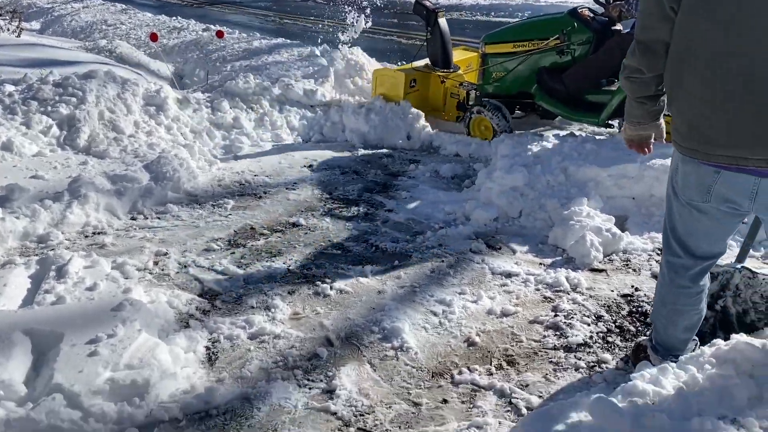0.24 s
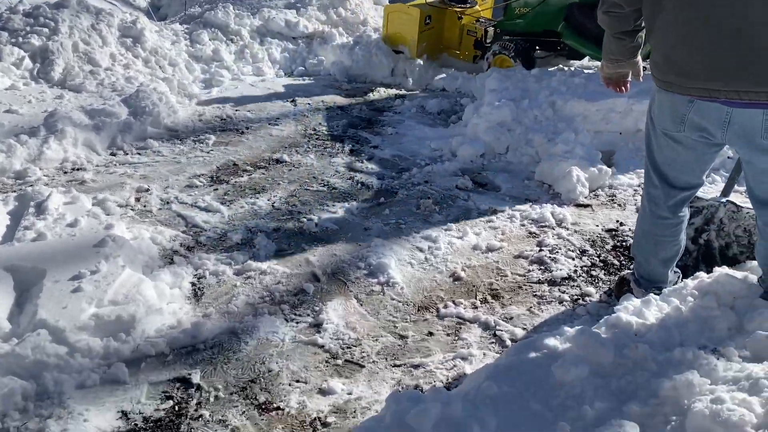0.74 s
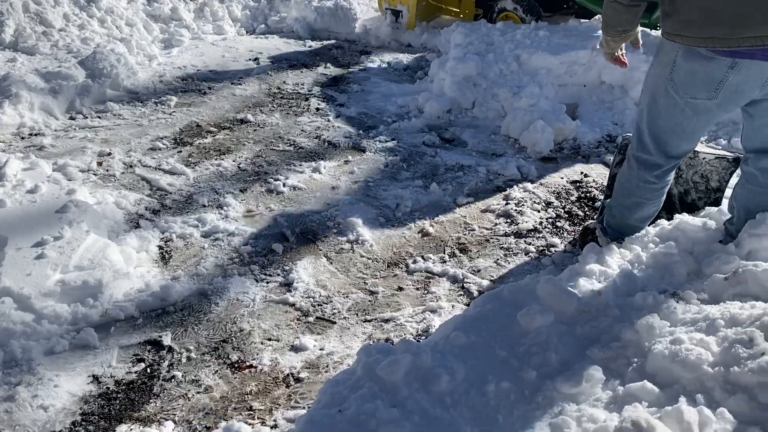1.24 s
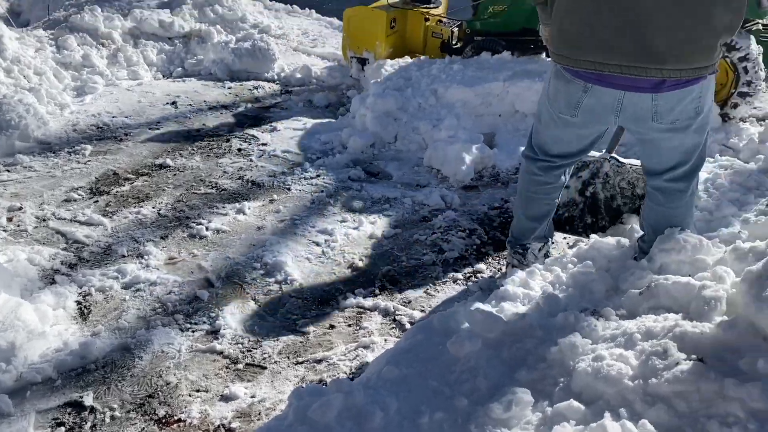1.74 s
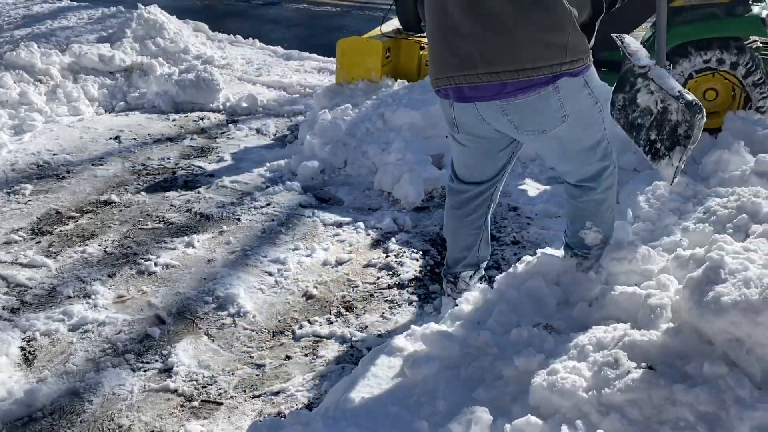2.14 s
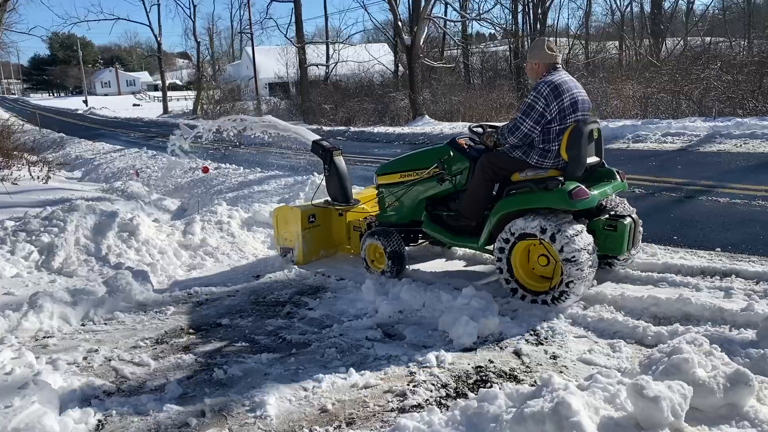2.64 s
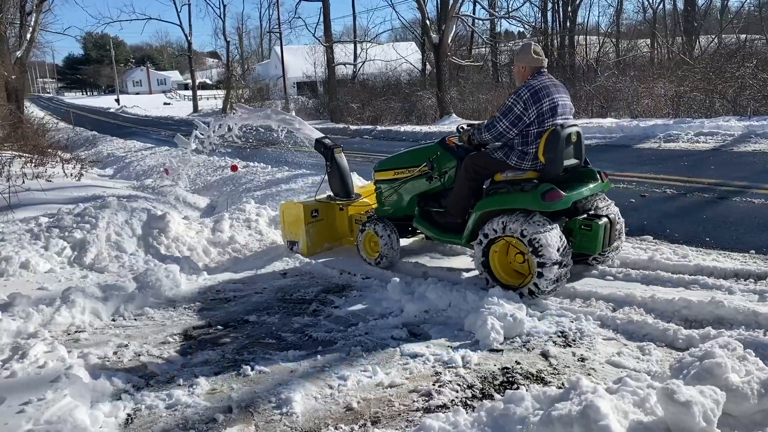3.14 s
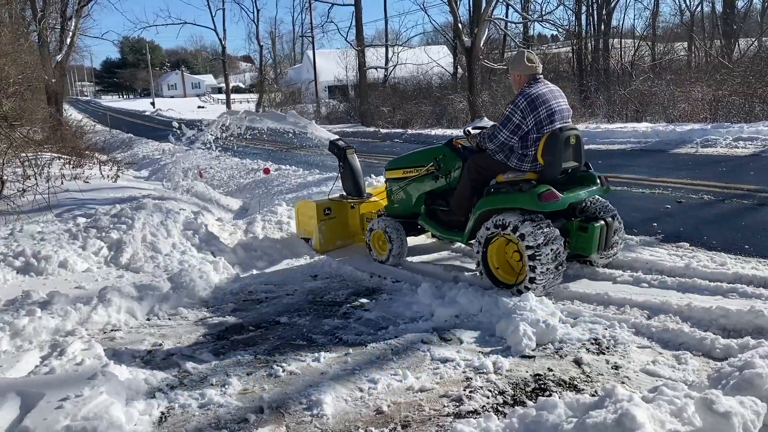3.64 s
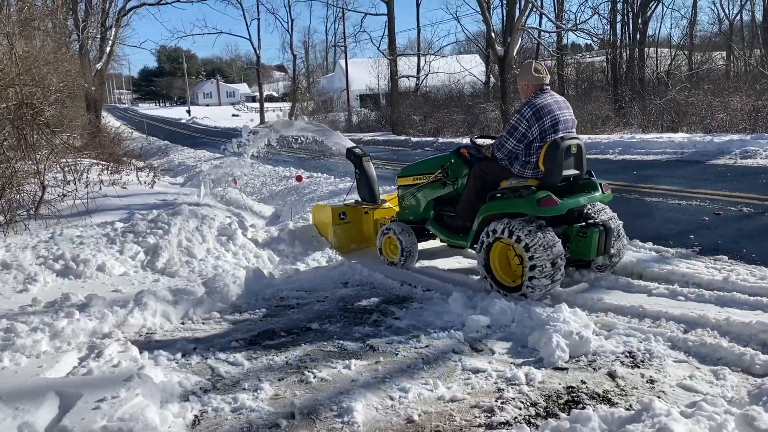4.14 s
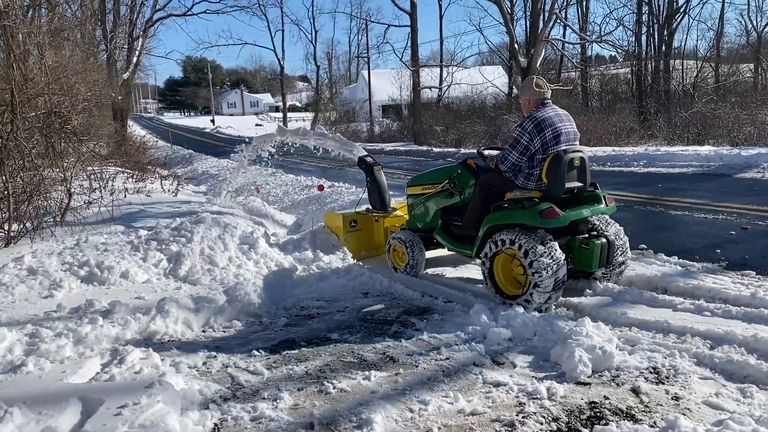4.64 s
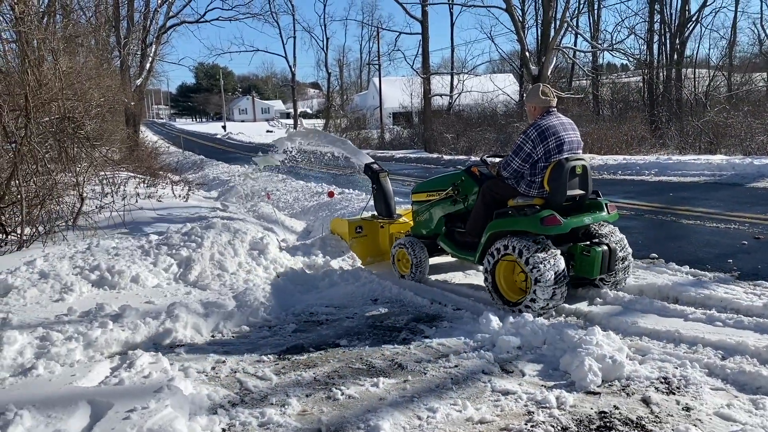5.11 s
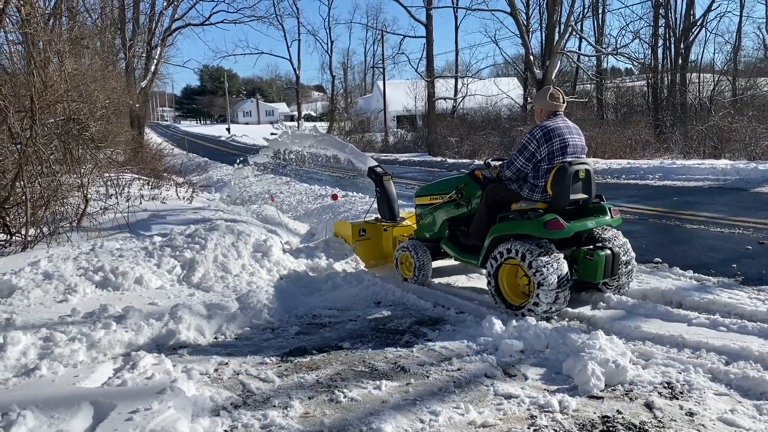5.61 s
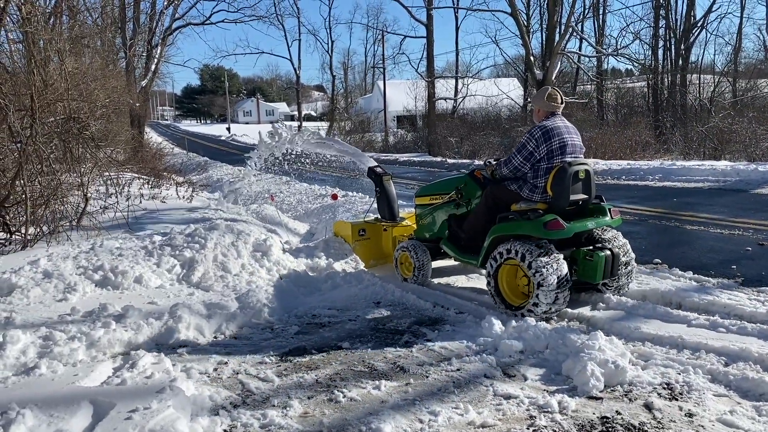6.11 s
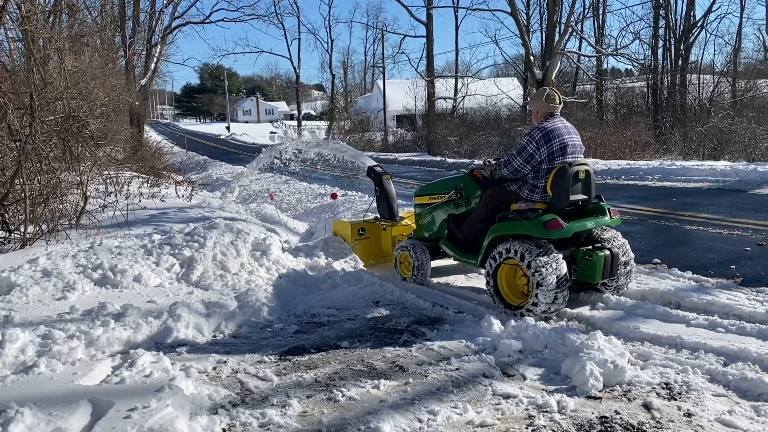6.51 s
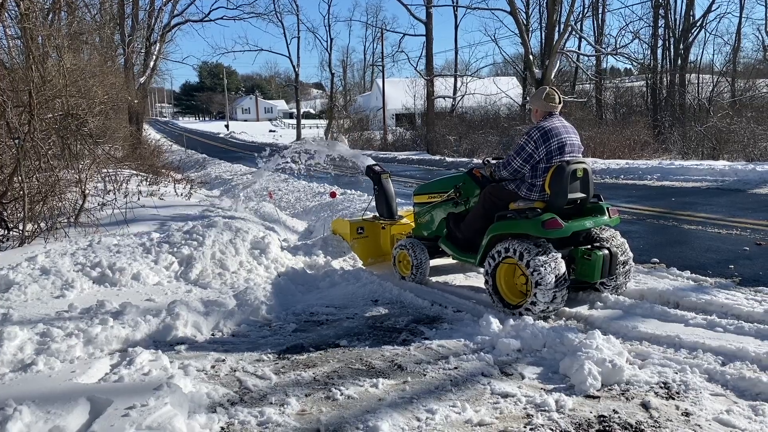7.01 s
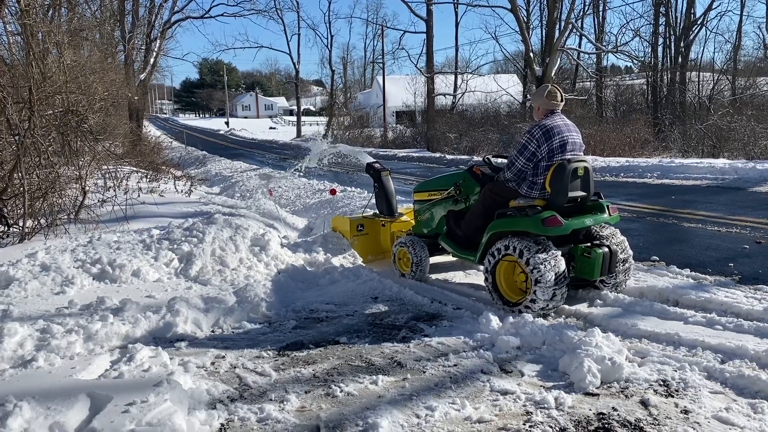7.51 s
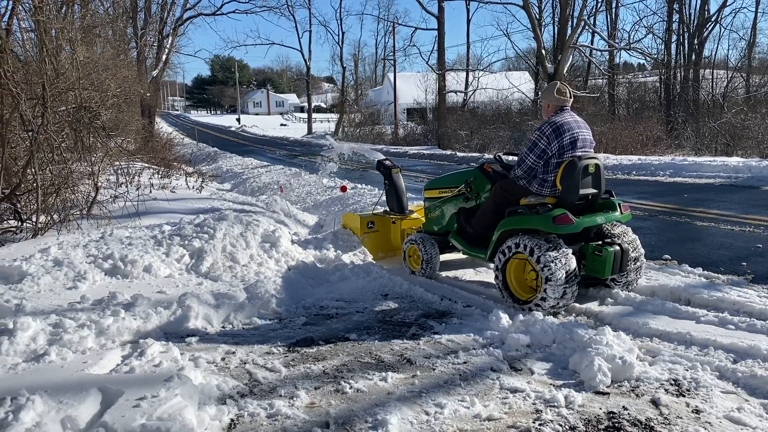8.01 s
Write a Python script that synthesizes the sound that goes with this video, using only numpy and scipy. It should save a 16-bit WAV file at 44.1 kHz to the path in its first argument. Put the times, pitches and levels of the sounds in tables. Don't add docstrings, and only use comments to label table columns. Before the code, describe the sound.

A continuous small-engine chug and broadband snowblower roar, heard on a phone held in the open air. The first part is more distant, with metallic ringing and brief squeaks. After a tiny dip it steps up, close and gritty, with impeller throb, whining gears and gushes of packed snow. Low dull thuds come midway, then a short metal knock late; the machine never stops.

```python
import sys
import numpy as np
from scipy import signal
from scipy.fft import irfft
from scipy.io import wavfile
from scipy.ndimage import uniform_filter1d, map_coordinates

SR = 44100
rng = np.random.default_rng(int(sys.argv[2]) if len(sys.argv) > 2 else 0)


def nominal_scale(level):
    x = np.asarray(level, float) / 20
    return 10 ** x


def master_out(mix):
    frames = np.transpose(np.atleast_2d(mix))
    ceiling = np.clip(frames, -1, 1)
    pcm = np.round(ceiling * 32767).astype(np.int16)
    wavfile.write(sys.argv[1], SR, pcm)


N = 364266
T = np.arange(N) / SR
HOP = 1024
F = np.maximum(np.arange(HOP + 1) * SR / (2 * HOP), 1)
CHANGE_S, CHANGE_FADE_S = 2.578, .007

# t/s, cycle rate f/Hz, exhaust level/dB, snow load as growl level/dB under the exhaust
ENGINE = [
    [(0.0, 25.24, -25, -21), (0.31, 24.82, -23, -23.5), (0.54, 24.55, -21.5, -19.5),
     (0.99, 26.12, -24, -23), (1.72, 24.44, -23, -14.5), (2.19, 25.96, -23.5, -11.5),
     (2.57, 25.97, -24, -15.5)],
    [(2.59, 25.01, -18.5, -9), (3.06, 25.29, -18.5, -10.5), (3.73, 24.63, -19, -10),
     (4.06, 24.89, -20.5, -8.5), (4.78, 23.91, -19, -5), (5.08, 25.29, -20, -5.5),
     (5.4, 24.71, -20.5, -6.5), (6.0, 25.8, -21, -8.5), (6.55, 24.88, -21, -9), (7.23, 26.2, -21, -10),
     (8.26, 25.72, -21.5, -12)],
]
# multiple of the cycle rate, level/dB
PARTIALS_FAR = [(1, -39), (2, -9.5), (3, -15.5), (4, -12), (5, 0), (6, -3.5), (7, -15.5), (8, -3.5),
                (9, -10.5), (10, -28), (11, -19), (12, -27), (13, -25.5), (14, -30), (15, -22.5),
                (16, -27.5), (17, -23.5), (18, -28.5), (19, -38), (20, -42)]
PARTIALS_NEAR = [(1, -36), (2, -6), (3, -12.5), (4, -13.5), (5, 1.5), (6, -5.5), (7, -22.5), (8, -7),
                 (9, -12), (10, -27.5), (11, -12.5), (12, -21), (13, -16.5), (14, -21.5), (15, -22.5),
                 (16, -23), (17, -20.5), (18, -29.5), (19, -34), (20, -41)]
MUFFLER = (.46, 1.3, .1, 1), (1.42, 1, .3, .5)
# multiple of the cycle rate, level/dB
THROB = [
    (1.86, -5),
    (3.72, 4.5),
    (5.58, 0.5),
    (7.44, -9),
]
# t/s, level/dB
BITES = [
    (2.8, 3),
    (4.23, 5.3),
    (5.15, 8),
    (5.7, 6.5),
    (6.44, 5),
    (6.82, 7.95),
]
BLOWER_BANDS = [90, 1000, 3300, 8000]
# f/Hz, far level/dB per Hz, near level/dB per Hz
ROAR = [(30, -82, -76), (49.95, -58.5, -50.5), (150.1, -58.5, -52), (403, -65, -56.5), (657, -67, -64.5),
        (990, -67, -60), (1320, -69, -65), (2400, -71, -65.5), (4470, -72, -68), (5360, -73.5, -77),
        (8500, -79.5, -72), (10800, -86, -77.5), (14200, -89.5, -80.5), (16000, -90, -85)]
# start t/s, end t/s, f/Hz, width f/Hz, level/dB
RINGS = [
    [(0, 2.6, 894, 29, -45), (-0.4, 1.65, 2590, 140, -41), (0.5, 1.996, 4100, 120, -50),
     (.76, 1.67, 6168, 79, -40.5), (0.2, 1.466, 4940, 240, -48), (0, 2.2, 7000, 220, -53.5),
     (2.04, 2.9, 1225, 42.3, -45), (-1.5, 2.6, 8860, 210, -48.5), (0.08, 1.7, 7700, 95, -50.5)],
    [(1.4, 8.3, 872, 42, -39), (2.5, 8.3, 1524, 54, -37.5), (2.8, 6, 1690, 90, -37.5),
     (4.22, 5.22, 1872, 40, -39.5), (1.8, 8.3, 2502, 35, -46), (2.1, 4.1, 4280, 170, -35.5),
     (2.7, 3.52, 6135, 72, -41.5), (2.3, 10, 7490, 170, -42), (2.9, 9.4, 8650, 290, -44.5),
     (5.9, 9.8, 3965, 50, -42.5), (2.5, 4.22, 5270, 140, -40), (2.2, 6.8, 1110, 91, -41.5),
     (3.06, 9.2, 6135, 72, -46.5), (2.5, 2.9, 4250, 220, -35.5)],
]
# t/s, lower f/Hz, upper f/Hz, depth [0-1]
NOTCHES = [(0, 6250, 7100, .5), (.4, 5900, 6950, .65), (.8, 5700, 6450, .9), (1.3, 5650, 6400, .9),
           (1.75, 6000, 6750, .8), (2.1, 5500, 7000, .6), (2.57, 5600, 6400, .6)]
PER_LOAD = (.5, 0.077, -0.081, .05), (1.5, -0.094, 0.0014, 0.14)
RECEDE = (.1, -0.1, -0.56, -0.24), (-.1, -0.8, 0.14, -0.42)
SHADOW = (2.5, 1.5, -4, -6)
PER_SLUG = (.9, 1, 0.6, 0.64)
# t/s, level/dB over the roar
SLUGS = [
    (2.60, 2),
    (3.74, 2.5),
    (3.86, 2.5),
    (4.52, -2),
    (6.08, -0.5),
    (6.88, 2.5),
    (7.275, 1.5),
    (7.79, 1.2),
    (8.21, 2.5),
]
# f/Hz, width f/Hz, level/dB, slope level/dB per s, t/s to come into view
WHINES = [
    (3780, 80, -33, 0.2, 1.09),
    (4710, 120, -33, -.3, 0.27),
]
# start t/s, end t/s, f/Hz, level/dB, wobble f/Hz
SQUEALS = [(.76, 1.16, 2085, -40.5, 6), (.1, .4, 1662, -44, 4), (7.12, 8.3, 2095, -45, 4),
           (2.58, 8.3, 737, -48, 5), (2.58, 6, 1652, -48, 8), (5.8, 8.3, 3972, -47, 12),
           (.35, 1.1, 2420, -43, 10), (.75, 1.2, 905, -47, 6), (0, 1.7, 2945, -46, 12),
           (0, .8, 3340, -47, 10), (2.15, 2.58, 1225, -44, 5), (4.6, 8.3, 890, -45, 4),
           (4.6, 8.3, 1040, -46, 4), (4.6, 8.3, 2500, -47, 5)]
# t/s, f/Hz, level/dB, rise t/s, 60 dB decay t/s
LUMPS = [
    (7.2700, 465, -2, .003, .055),
    (7.2695, 630, -8, .0015, .03),
    (7.2700, 950, -14, .0015, .03),
    (7.2700, 1400, -13, .001, .025),
    (5.48, 88, -9, .03, .35),
    (5.22, 90, -18, .015, .16),
    (6.81, 95, -16, .015, .22),
    (4.77, 90, -17, .015, .22),
]
# f/Hz, lead/rad
LEAD = [
    [(0, 0), (1210, -0.4), (4910, 0.6), (6120, -0.9), (7670, 0.2), (8010, 2.6), (8440, 2.5), (9470, 1.8), (9910, 0.2), (11900, -0.2), (12500, -3.1), (14400, -3.2), (15000, -6.3), (15500, -6.3)],
    [(0, 0), (4650, 0.5), (5250, 2.0), (5510, 0.0), (6120, -1.7), (6460, 0.8), (7320, -1.2), (8870, 2.3), (10400, -0.1), (11600, 0.1), (12600, -3.0), (14400, -3.3), (15000, -6.2), (15500, -6.3)],
]
# f/Hz, left minus right level/dB
PAN = [
    [(60, 0.0), (110, 5), (200, -2), (380, 2.5), (700, -2.5), (1290, -2.5), (2380, 0.5), (4400, 1.5), (8120, -1), (15000, 0.0)],
    [(60, -1), (110, 3.5), (200, -1), (380, 0.5), (700, -3), (1290, 0.5), (2380, 1), (4400, -4), (8120, -1), (15000, -1)],
]
# f/Hz, likeness [0-1]
ALIKE = [(300, 0.96), (900, 0.78), (2000, .95), (2600, 1), (4500, 0.8), (6000, 0.49), (9000, 0.64),
         (10500, 0.8), (11500, .97), (12300, .55), (13100, .97), (13900, 0.86), (14500, .55), (15200, 0.9)]
# t/s, left minus right level/dB
SWAY = [
    (0.0, -0.5),
    (2.46, -1.5),
    (2.69, 1),
    (3.93, 1.0),
    (4.42, 0.5),
    (8.26, 1.0),
]


def curves(table, t):
    s, *columns = np.transpose(table)
    return [np.interp(t, s, column) for column in columns]


def on_log(table, hz):
    at, *columns = np.transpose(table)
    return [np.interp(np.log(hz), np.log(at), column) for column in columns]


def walk(rate, t):
    steps = np.arange(t[0], t[-1] + 1, .25 / rate)
    levels = rng.standard_normal(len(steps))
    levels = uniform_filter1d(uniform_filter1d(levels, size=4), size=4)
    return np.interp(t, steps, levels / levels.std())


def peak(hz, width_hz, db):
    return nominal_scale(2 * db) * 2 / (np.pi * width_hz) / (1 + (2 * (F - hz) / width_hz) ** 2)


def controls(t, shot):
    hz, exhaust_db, growl_db = curves(ENGINE[shot], t)
    return hz, exhaust_db + (0.6, -1.2)[shot], growl_db - growl_db.mean()


def lag(k, centre, width):
    return np.angle(1 - (k / centre) ** 2 + 1j * width * k / centre)


def engine(t, turns, shot, exhaust_db, growl_db):
    out = 0
    rest, lower, width, upper = MUFFLER[shot]
    for k, db in (PARTIALS_FAR, PARTIALS_NEAR)[shot]:
        phase = rest - lower * lag(k, 4.5, .1) - upper * lag(k, 7, width)
        phase += 1.3 * np.arctan((2 / k) ** 4)
        phase -= (.3, .01)[shot] * max(k - 8, 0) ** 2
        scatter_db = min(.11 * k, 1.2) * walk(6, t)
        slip = min(.02 * k, .2) * walk(8, t)
        load_db = growl_db * np.clip((k - (8.5, 7)[shot]) / 3, 0, 1)
        out = out + nominal_scale(db + load_db + scatter_db) * np.cos(2 * np.pi * k * turns + phase + slip)
    return np.sqrt(2) * nominal_scale(exhaust_db) * out


def clatter(t, turns, shot, exhaust_db):
    order, renewals_per_s = np.arange(513), 1.5
    rows = int((t[-1] - t[0]) * renewals_per_s) + 2
    colour = nominal_scale(2 * on_log(ROAR, np.maximum(25 * order, 1))[shot]) ** .5
    colour = colour * (order > 20) * (order < 85)
    colour = colour * nominal_scale(5 * np.minimum(rng.exponential(size=513), 2))
    chance = rng.standard_normal((2, rows, 513))
    patterns = irfft((chance[0] + 1j * chance[1]) * colour)
    patterns = np.hstack([patterns, patterns[:, :1]]) / patterns.std()
    rattle = map_coordinates(patterns, [(t - t[0]) * renewals_per_s, turns % 1 * 1024], order=1)
    return nominal_scale(exhaust_db + (-18, -12.5)[shot]) * rattle


def blower_levels(t, shot):
    shadow = (1 - shot) * np.interp(t, (1.97, 2.1), [0, 1])
    causes = [controls(t, shot)[2], t - t.mean(), shadow - shadow.mean(), slugs(t)]
    answers = [PER_LOAD[shot], RECEDE[shot], SHADOW, PER_SLUG]
    return sum(np.outer(answer, cause) for answer, cause in zip(answers, causes))


def blower_power(t, shot):
    band = np.arange(4)
    place = np.interp(np.log(F), np.log(BLOWER_BANDS), band)
    level_db = blower_levels(t, shot).T @ np.maximum(1 - abs(place - band[:, None]), 0)
    power = nominal_scale(2 * on_log(ROAR, F)[shot]) * np.ones((len(t), 1))
    for start_s, end_s, hz, width_hz, db in RINGS[shot]:
        swell = np.clip(np.minimum(t - start_s, end_s - t) / 0.12 + .5, 0, 1)
        power = power + np.outer(swell ** 2, peak(hz, width_hz, db))
    power = power * nominal_scale(2 * level_db)
    if shot:
        power = power + whines(t)
    else:
        *notch_hz, depth = (column[:, None] for column in curves(NOTCHES, t))
        for hz in notch_hz:
            power = power * (1 - depth / (1 + ((F - hz) / 110) ** 2)) ** 2
    patches = rng.standard_normal(power.shape)
    patches = uniform_filter1d(uniform_filter1d(patches, size=21, axis=0), size=4, axis=1)
    depth_db = (2.2, .9)[shot] * np.clip(F / 1500, 0, 1)
    return power * nominal_scale(2 * depth_db * patches / patches.std())


def blower(start, stop, shot, turns):
    count = (stop - start) // HOP + 2
    power = blower_power((start + HOP * np.arange(count)) / SR, shot)
    chance = rng.standard_normal((2, 3, count, HOP + 1))
    direct, left, right = (chance[0] + 1j * chance[1]) * np.sqrt(power * SR * HOP / 2)
    half = np.exp(.5j * np.interp(F, *np.transpose(LEAD[shot])))
    half = half * nominal_scale(on_log(PAN[shot], F)[0] / 2)
    alike = np.clip(on_log(ALIKE, F)[0], 0, 1)
    pair = np.sqrt(alike) * direct * np.array([[half], [1 / half]])
    pair = pair + np.sqrt(1 - alike) * np.array([left, right])
    gas = np.interp(np.log(F), np.log([150, 400, 1500, 4000]), [.2, 0.76, 1.1, .35])
    window = np.sin(np.pi * (np.arange(2 * HOP) + .5) / (2 * HOP))
    frames = irfft(np.array([pair, gas * pair])) * window
    joined = frames[:, :, 1:, :HOP] + frames[:, :, :-1, HOP:]
    steady, pulsed = joined.reshape(2, 2, -1)[..., :stop - start]
    puff = np.exp(-((turns + .1) % 1) / 0.054)
    puff = puff + 0.27 * np.exp(-((turns + .1 - 3 / 8) % 1) / 0.078)
    return nominal_scale(0.43 * walk(30, T[start:stop])) * (steady + puff * pulsed)


def squeals():
    out = 0
    for start_s, end_s, hz, db, wobble_hz in SQUEALS:
        swell = np.clip(np.minimum(T - start_s, end_s - T) / 0.045, 0, 1)
        level = nominal_scale(db - 0.5 + 2.2 * walk(25, T)) * swell
        pitch_hz = hz + wobble_hz * (walk(5, T) + 2 * walk(40, T))
        out = out + level * np.sqrt(2) * np.sin(2 * np.pi * np.cumsum(pitch_hz) / SR)
    return out


def impeller(t, turns, load_db):
    level_db = -38 + .5 * load_db + 1.5 * walk(2.53, t)
    level_db = level_db + sum(db * np.exp(-((t - s) / 0.098) ** 2) for s, db in BITES)
    out = 0
    for k, db in THROB:
        level = np.sqrt(2) * nominal_scale(level_db + db + 2.0 * walk(5.9, t))
        out = out + level * np.cos(2 * np.pi * k * turns + 0.62 * walk(3.12, t))
    return out


def whines(t):
    out, cycle_hz = 0, controls(t, 1)[0]
    for hz, width_hz, db, slope_db, arrives_s in WHINES:
        hidden = np.clip(1 - (t - CHANGE_S) / arrives_s, 0, 1) ** .5
        centre_hz = hz + 30 * (cycle_hz - cycle_hz.mean()) + 22 * walk(4.97, t)
        level_db = db + slope_db * (t - t.mean()) - 8 * hidden
        level_db = level_db + 1.05 * slugs(t) * (1 - hidden) + .6 * walk(9, t)
        out = out + peak(centre_hz[:, None], width_hz, level_db[:, None])
    return out


def slugs(t):
    rise_s, fall_s = 0.035, 0.055
    return sum(db * np.exp(-np.where(t < s, (s - t) / rise_s, (t - s) / fall_s)) for s, db in SLUGS)


def lumps():
    out, sag_s = 0, .012
    for s, hz, db, rise, t60 in LUMPS:
        t = np.maximum(T - s, 0)
        cycles = hz * (.75 * t + .25 * sag_s * (1 - np.exp(-t / sag_s)))
        out = out - nominal_scale(db - 60 * t / t60) * (1 - np.exp(-t / rise)) * np.sin(2 * np.pi * cycles)
    return out


def scene():
    motor, noise = np.zeros(N), np.zeros((2, N))
    edges = (0, int(CHANGE_S * SR), N)
    for shot in range(2):
        start, stop = edges[shot:shot + 2]
        t = T[start:stop]
        hz, exhaust_db, load_db = controls(t, shot)
        growl_db = (-0.6, 1.35)[shot] + 1.07 * load_db
        turns = np.cumsum(uniform_filter1d(hz, size=SR // 5)) / SR + (.1, .3)[shot]
        motor[start:stop] = engine(t, turns, shot, exhaust_db, growl_db)
        motor[start:stop] += clatter(t, turns, shot, exhaust_db)
        noise[:, start:stop] = blower(start, stop, shot, turns)
        if shot:
            motor[start:stop] += impeller(t, turns, load_db)
    sway_db, = curves(SWAY, T)
    return (motor + squeals() + lumps()) * nominal_scale(np.array([sway_db, -sway_db]) / 2) + noise


def low_pass(x):
    return signal.sosfilt(signal.butter(12, 15900, fs=SR, output="sos"), x)


def record(dry):
    fade = np.clip(abs(T - CHANGE_S) / CHANGE_FADE_S, .05, 1) ** 1.4
    heard = signal.sosfilt(signal.butter(4, 38, "high", fs=SR, output="sos"), dry)
    return low_pass(heard * fade)


dry = scene()
out = record(dry)
master_out(out)
```